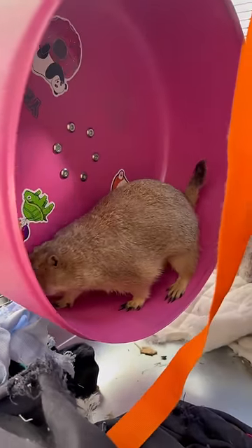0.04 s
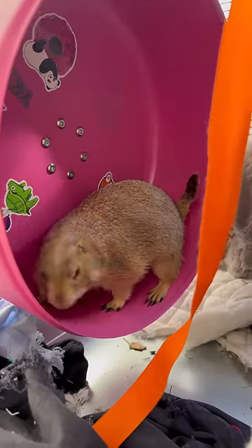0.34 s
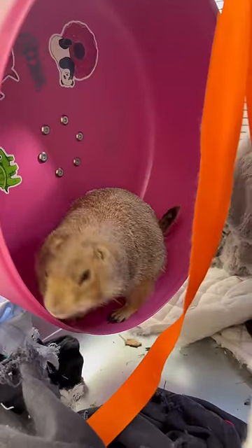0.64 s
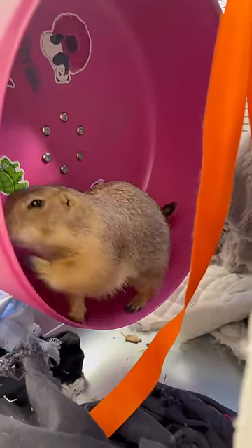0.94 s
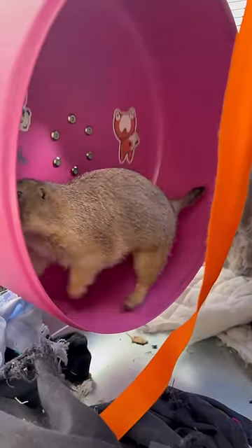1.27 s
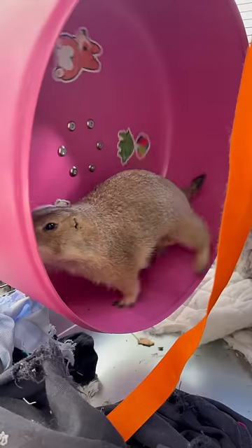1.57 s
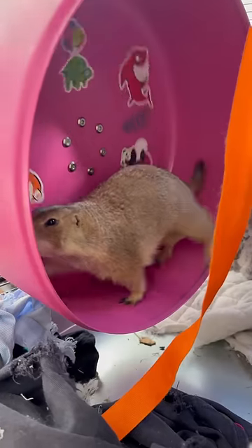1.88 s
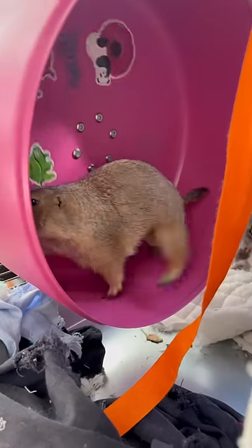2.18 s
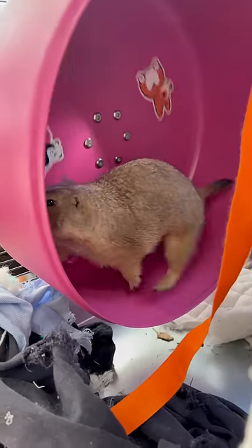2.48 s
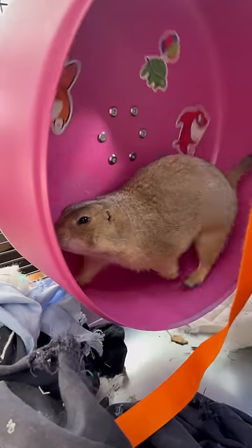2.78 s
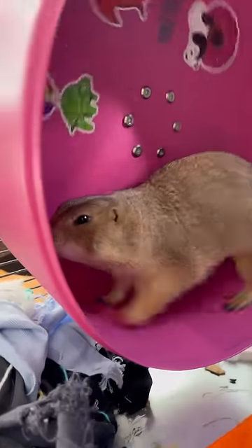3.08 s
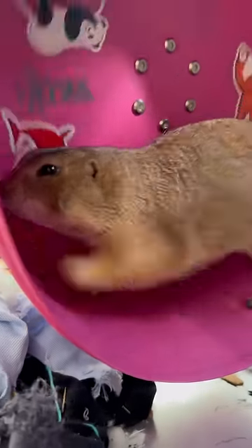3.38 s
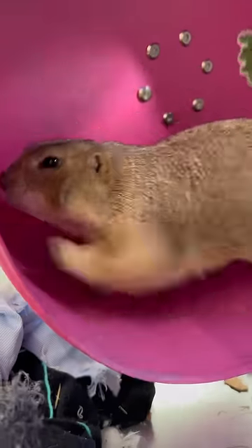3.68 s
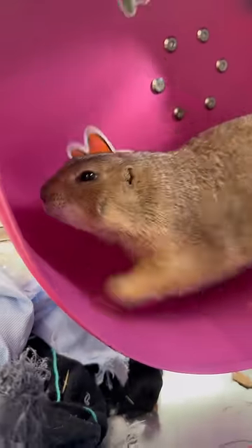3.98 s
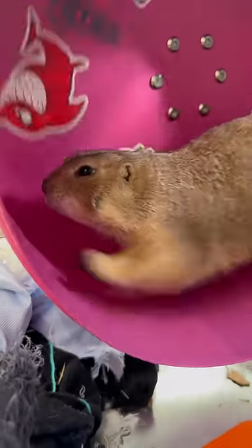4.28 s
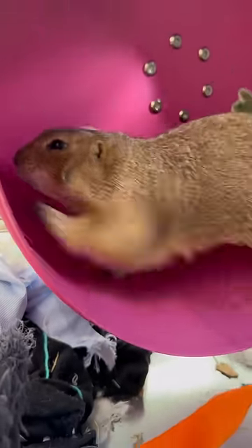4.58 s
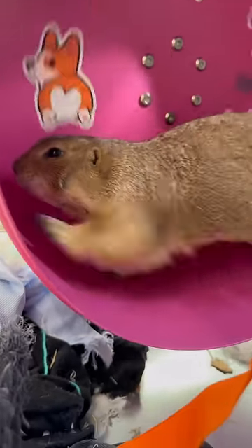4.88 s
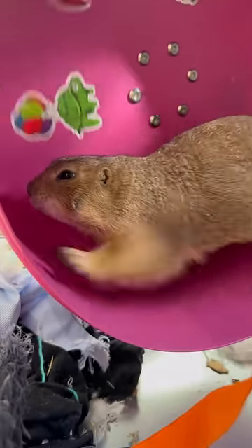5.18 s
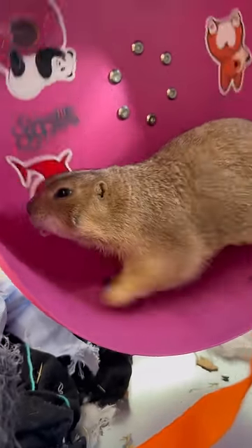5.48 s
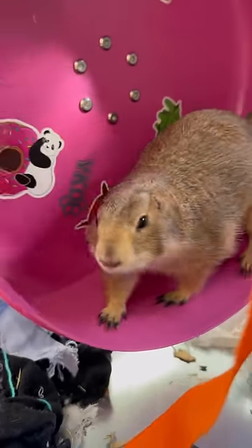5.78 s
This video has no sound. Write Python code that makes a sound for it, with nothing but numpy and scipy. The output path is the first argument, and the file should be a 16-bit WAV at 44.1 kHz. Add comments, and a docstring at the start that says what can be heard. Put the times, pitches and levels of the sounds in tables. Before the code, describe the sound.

Rapid metallic clicking and a low plastic rumble come from an exercise wheel as a prairie dog runs in it indoors.

```python
"""Prairie dog in an exercise wheel

Close to a stereo microphone in a small room, a prairie dog nudges a plastic wheel, runs in it and stops.
Each stride, about ten a second, throws the loose steel balls of the hub bearing in a shower of clicks.
At a run they drop back with a short rebound; the hardest contacts ring the hub, each at its own pitch.
Paws thump the drum, which rumbles, jolts on its axle and rocks on its stand; a wire frame rings on."""
import sys
import numpy as np
from scipy import signal
from scipy.fft import rfft, irfft, next_fast_len
from scipy.io import wavfile
from scipy.ndimage import map_coordinates

SR = 44100
rng = np.random.default_rng(int(sys.argv[2]) if len(sys.argv) > 2 else 0)


def waveform_to_disk(signal):
    """Save audio, clipped to [-1, 1], as 16-bit WAV at the path in sys.argv[1]."""
    frames = np.transpose(np.atleast_2d(signal))
    scaled = np.clip(frames, -1, 1) * 32767
    samples = np.round(scaled).astype(np.int16)
    wavfile.write(sys.argv[1], SR, samples)


N = 257544

# The small room. Each row: frequency in Hz, decay time (t60) in seconds.
ROOM_DECAY = [(200, 0.3), (2000, 0.74), (6000, 0.18), (15000, 0.13)]
# The microphone's two ports. Each row: frequency in Hz, then the value named alongside.
PORT_LIKENESS = [(60, 1), (300, .99), (640, .6), (1200, .95), (2200, .9), (3100, .6), (4500, .52),
                 (5500, .84), (8000, .76), (11000, .99), (13000, .99), (15500, .3)]  # likeness of left and right, 0 to 1
PORT_LEAD = [(60, 0), (5000, 0), (6200, -.6), (8000, -1.7), (10000, -2.9), (11000, -3.12), (13600, -3.2),
             (15400, -4.2)]  # lead of the left in radians
PORT_BALANCE = [(100, 0), (220, 0), (350, -3.3), (700, -3.8), (1100, -1.5), (1600, 0)]  # left over right in dB

# Noise colours. Each row: frequency in Hz, relative spectral density in dB.
HISS_SPECTRUM = [(300, 14.5), (700, 6), (1500, 1), (4000, -14), (10000, -22), (16000, -28)]  # faint background
RUMBLE_SPECTRUM = [(20, -48), (32, -12), (42, -11), (55, 1), (68, -3.5), (95, -7.5), (125, -26), (200, -22),
                   (500, -78)]  # low end of the turning wheel
SHELL_SPECTRUM = [(30, -19), (70, 1), (120, -2), (150, -3.5), (185, 0.5), (225, -8.5), (290, -3),
                  (315, -10), (345, 2), (390, 2), (430, -9.5), (530, -23.5), (680, -12), (850, -25.5),
                  (1500, -26), (4000, -22.5)]  # drone of the plastic drum
SCUFF_SPECTRUM = [(350, -22), (650, 1), (900, -3.5), (1200, -3.5), (1600, -7.5), (2500, -26)]  # feet brushing the plastic
ROLLING_SPECTRUM = [(900, -51), (1550, -32), (1850, 0.5), (2050, 0), (2450, -12), (2800, 4.5), (4500, 9),
                    (7000, -1), (9500, 2), (12000, -14), (15000, -8)]  # balls rolling in their race
TICK_SPECTRUM = [(1500, -55), (4000, -40), (7000, -4.5), (8500, 4), (10000, 7.5), (11500, 2), (13000, 6.5),
                 (14500, -2), (16000, 4)]  # bright front of a shower
CLATTER_SPECTRUM = [(600, -38), (1500, -31), (2300, -19.5), (2800, -8.5), (3600, -9.5), (4400, -1),
                    (5200, -4.5), (5900, 1), (7300, 0.5), (8500, -5.5), (11000, -41), (16000, -42)]  # duller body of a shower

# The parts that ring. Each row: frequency in Hz, relative level in dB, t60 in seconds.
DRUM_MODES = [(186.5, -7.5, 0.18), (289.6, -10.5, 0.18), (344, 9, 0.26), (370, 10, 0.11), (388.5, 3, 0.15),
              (469.2, -9, 0.44), (682, -11, 0.2)]  # plastic drum
MOUNT_MODES = [(446, 6.5, 0.061), (598, 5, 0.077), (674, 4.5, 0.17), (785, 6, 0.039), (917, -3, 0.22),
               (1196, -6, 0.28)]  # axle mount
FRAME_MODES = [(1836, -12, .9), (1960, -6, 0.45), (2261, -15, .5), (2604, -13, 0.8), (3698, -2, 0.5),
               (4140, 0, 0.5), (4339, -10, 0.32), (4544, -8, 0.25), (5491, -8, 0.25)]  # wire frame
PLATE_MODES = [(1771, -11, 0.9), (1831, -6, 0.2), (1965, 0, 0.09), (2013, 3.5, 0.12), (2075, 0, 0.08),
               (2210, 1, 0.11), (2330, 5, 0.11), (2612, 6, 0.07), (2672, 10, 0.06), (2740, 4, 0.1),
               (3030, 2, 0.12), (3130, 8, 0.08), (3300, 6, 0.11), (3560, 3, .1)]  # hub plate
RACE_MODES = [(3156, -4, 0.07), (4140, -7, 0.1), (4340, 1, .06), (4481, 2, 0.06), (4816, -2, 0.07),
              (4980, -2, 0.1), (5209, -3, 0.12), (5435, -2, 0.11), (5745, 2, 0.07), (5875, 3, 0.07),
              (5996, 1, 0.1), (6403, 1, .13), (6770, 0, .1), (7215, 3, 0.08), (7465, 1, 0.07),
              (8076, 0, 0.08), (8450, -2, 0.06), (9946, -8, 0.06), (15211, -10, .06)]  # bearing race

# The wheel rocking on its stand. Each row: time in seconds, mean pitch in Hz, mean level in dB.
STAND_ROCKING = [(0.0, 58.1, -56), (1.2, 56, -60), (1.85, 56.6, -57), (2.2, 52.5, -46.5),
                 (2.4, 52.4, -50.5), (2.75, 54, -55), (3.5, 54, -53), (3.7, 48.7, -51), (3.85, 47.3, -48.5),
                 (4.18, 48, -44.5), (4.3, 48.3, -48), (4.75, 47, -48), (5.0, 50.2, -56), (5.3, 49.96, -47),
                 (5.84, 54.5, -52)]
# The wheel turning. Each row: time in seconds, relative levels of drum and of rolling balls in dB.
WHEEL_LEVELS = [(0.0, -61, -105), (0.37, -63, -58), (0.63, -60.5, -49.5), (0.88, -61.5, -54.5),
                (1.54, -54, -35), (2.18, -52.5, -38.5), (2.5, -53, -40), (3.12, -48.5, -37.5),
                (4.02, -48, -38), (4.38, -47, -37), (5.46, -48, -39.5), (5.84, -52, -50)]
# Single blows. Each row: start in seconds, relative level in dB.
PAW_THUMPS = [(0.365, -37.5), (0.792, -46), (1.499, -52), (1.87, -37.5), (3.451, -33), (3.578, -31),
              (3.876, -32), (4.033, -39), (4.172, -36), (4.34, -34), (4.39, -33), (4.569, -35),
              (4.715, -30.5), (5.04, -33), (5.41, -33.5), (5.662, -35), (5.788, -35.5)]  # the heaviest footfalls
AXLE_JOLTS = [(1.741, -55), (3.575, -54), (3.927, -52), (4.029, -58), (4.22, -50), (4.359, -54),
              (4.454, -52), (4.512, -54), (4.801, -52)]  # the wheel shifting on its axle
FRAME_RINGS = [(0.0, -65), (5.68, -50)]  # the frame left ringing
# The hardest contacts in the hub. Each row: start in seconds, relative level in dB, centre pitch in Hz.
PLATE_KNOCKS = [(0.505, -46, 2105), (0.515, -54, 1670), (0.745, -50.5, 2360), (1.141, -48.5, 1953),
                (1.37, -48.5, 1990), (1.372, -40, 2900), (1.52, -46.5, 1915), (1.753, -42, 3000),
                (2.045, -41, 3250), (2.385, -49, 2070), (2.584, -46, 2730), (2.689, -39.5, 2860),
                (2.77, -41.5, 1950), (2.88, -40, 2820), (3.25, -44, 1990), (3.254, -47, 2770),
                (3.319, -48, 2700), (3.355, -47, 2020), (3.408, -43, 2840), (3.44, -45, 2100),
                (3.472, -45, 2775), (3.542, -41.5, 2000), (3.546, -41.5, 2600), (3.621, -45, 2110),
                (3.84, -45, 1910), (3.843, -41, 2610), (4.13, -37.5, 2638), (4.197, -41.5, 2700),
                (4.317, -44, 2750), (4.387, -40.5, 2740), (4.42, -38, 2660), (4.61, -42, 2800),
                (4.7, -48, 2130), (4.706, -42, 2720), (4.908, -49, 2700), (5.009, -45.5, 2700),
                (5.303, -46.5, 2510), (5.616, -35.5, 2840), (5.681, -52, 1875)]  # on the plate
HUB_PINGS = [(0.506, -34, 4310), (0.717, -30.5, 5970), (1.359, -24, 5980), (1.515, -29, 4350),
             (1.529, -27, 6400), (1.68, -34, 5990), (1.914, -31, 7570), (2.235, -31, 5860),
             (2.382, -30, 5860), (2.551, -23, 5750), (2.663, -23, 7640), (2.764, -25.5, 8460),
             (2.851, -24, 7560), (2.94, -27.5, 5970), (3.039, -32, 7290), (3.125, -29.0, 7040),
             (3.226, -28.5, 4880), (3.321, -31.0, 7270), (3.415, -31.0, 4450), (3.506, -25.5, 4340),
             (3.702, -30, 8090), (3.99, -26, 7900), (4.077, -27.5, 6850), (4.19, -25, 9270),
             (4.281, -31, 4500), (4.489, -24, 7250), (4.575, -30.5, 4330), (4.662, -32.5, 4690),
             (4.972, -26, 7270), (5.175, -24.5, 7270), (5.28, -29, 4730), (5.487, -32, 5740),
             (5.613, -29.5, 5970)]  # higher and shorter, set off by showers
# Shakes of the bearing, from a stride or the drop after it.
# Each row: peak time in seconds, relative level in dB, swell time in seconds, dullness in dB.
BEARING_SHOWERS = [(0.451, -31.5, 0.011, 3), (0.498, -13.5, 0.013, -5), (0.505, -16, 0.0014, 3.5),
                   (0.582, -21, 0.0068, -1), (0.678, -27.5, 0.0038, -8), (0.72, -23, 0.023, -1),
                   (0.904, -22, 0.0046, 3), (1.009, -22, 0.0014, 0.5), (1.053, -36, 0.028, -0.5),
                   (1.155, -25.5, 0.023, -0.5), (1.197, -19, 0.0014, -5.5), (1.249, -31, 0.023, 3),
                   (1.303, -20, 0.001, -0.5), (1.35, -19.5, 0.0012, -11), (1.357, -13, 0.0025, -6),
                   (1.37, -16, 0.006, 5.5), (1.404, -33, 0.016, 12), (1.454, -40.5, 0.027, 9),
                   (1.504, -15.5, 0.0085, 2), (1.535, -17, 0.0088, 8.5), (1.578, -26, 0.0095, 6),
                   (1.617, -20, 0.0084, 3.5), (1.646, -26, 0.00087, -2), (1.682, -11.5, 0.007, -4),
                   (1.751, -26, 0.016, -4.5), (1.818, -15.5, 0.0072, -5.5), (1.914, -14, 0.012, -3),
                   (1.954, -26, 0.001, -4), (1.977, -20, 0.0025, -8), (1.997, -26.0, 0.0027, 2),
                   (2.039, -22, 0.0079, 0.5), (2.094, -17.5, 0.0028, -2), (2.165, -24.0, 0.0018, 1),
                   (2.184, -21, 0.0042, 1), (2.237, -16, 0.0026, -3.5), (2.276, -27, 0.00094, 3),
                   (2.305, -25.5, 0.019, 0.5), (2.386, -15.5, 0.0069, 0), (2.44, -20, 0.003, 0),
                   (2.47, -21.5, 0.0061, 0.5), (2.506, -26.5, 0.0011, 3), (2.54, -16.5, 0.0022, -8),
                   (2.553, -12, 0.0058, -1), (2.591, -22, 0.0083, -0.5), (2.665, -18, 0.0025, 0.5),
                   (2.692, -26, 0.0027, 10), (2.764, -19, 0.01, 4), (2.795, -37, 0.0067, 16),
                   (2.838, -16, 0.0016, -15), (2.851, -11.5, 0.0056, -2.5), (2.882, -26, 0.002, 12),
                   (2.941, -15, 0.0037, -5.5), (2.981, -20.5, 0.0022, -4), (3.015, -30, 0.0014, 8),
                   (3.032, -13.5, 0.0014, -5), (3.041, -16, 0.004, -3), (3.077, -24.5, 0.001, -2.5),
                   (3.122, -14.5, 0.0037, -6), (3.132, -11.5, 0.0025, -5), (3.156, -19, 0.0012, -1),
                   (3.182, -30, 0.025, 2.5), (3.228, -13.5, 0.0031, -6.5), (3.253, -21, 0.001, -6),
                   (3.307, -35, 0.01, 7), (3.323, -16.5, 0.0035, -5.5), (3.356, -21, 0.0013, -3.5),
                   (3.406, -12.5, 0.0014, -7.5), (3.415, -12.5, 0.006, -5), (3.444, -20, 0.0033, -3),
                   (3.48, -32, 0.042, 4), (3.504, -11.5, 0.0031, -4), (3.549, -21, 0.0011, -11),
                   (3.615, -22.5, 0.012, -3), (3.629, -24, 0.001, 6.5), (3.698, -13, 0.0018, -3),
                   (3.708, -14.5, 0.0052, -5), (3.736, -21, 0.0027, 0), (3.774, -29, 0.021, -1),
                   (3.791, -16, 0.0023, 0.5), (3.842, -22, 0.00094, 1), (3.905, -16.5, 0.0055, -4),
                   (3.928, -23.5, 0.0011, -2), (3.994, -19.5, 0.0062, 0.5), (4.028, -17.5, 0.0015, -4),
                   (4.06, -28.5, 0.0041, 2), (4.081, -18, 0.0064, -4.5), (4.133, -20, 0.00091, -4),
                   (4.171, -32, 0.0015, -5), (4.195, -16, 0.0062, -2.5), (4.218, -22, 0.001, -5),
                   (4.279, -14, 0.006, -4.5), (4.319, -21, 0.00086, -4), (4.354, -27.5, 0.013, 1),
                   (4.374, -14.5, 0.0035, 1), (4.424, -18, 0.00093, -4), (4.482, -11, 0.003, -7),
                   (4.494, -13.5, 0.0048, 3), (4.511, -20.5, 0.0013, -4), (4.572, -14, 0.0065, -1),
                   (4.612, -19.5, 0.0011, -3.5), (4.643, -26.5, 0.0097, -3), (4.662, -15.5, 0.0026, 2.5),
                   (4.71, -21.5, 0.0014, -5.5), (4.782, -26, 0.0054, -4), (4.798, -25.5, 0.001, -3),
                   (4.868, -14.5, 0.0079, -3), (4.909, -20.5, 0.0035, -4), (4.975, -18, 0.0071, -1),
                   (5.013, -20.5, 0.0021, -2), (5.075, -16.5, 0.0017, -3.5), (5.107, -21.5, 0.0012, -2),
                   (5.166, -15, 0.0018, -9.5), (5.178, -11.5, 0.003, -3.5), (5.209, -23, 0.0015, 3),
                   (5.276, -18.5, 0.0021, -11), (5.285, -20.5, 0.0032, 2), (5.304, -23.5, 0.0015, 6),
                   (5.372, -20.5, 0.0024, -3), (5.392, -29, 0.00077, -8), (5.418, -26, 0.001, -8),
                   (5.486, -13.5, 0.004, -13.5), (5.497, -12, 0.0052, -0.5), (5.534, -22, 0.0063, -4.5),
                   (5.622, -17.5, 0.019, -3), (5.677, -22, 0.02, -2.5), (5.784, -32.5, 0.0022, -3)]

TOP_HZ, RACE_LOWEST_HZ = 15800, 1510  # band limit; the race's ringing is kept above the second
FADE_S, FADE_PER_SWELL = 0.0048, 0.38  # a shower's fade time: its floor, and the share of the swell added
DULL_SHARE = 0.55  # this share of the dullness adds to clatter and race; the rest comes off the ticks


def amp(db):
    """Decibels to gain."""
    return 10 ** (np.asarray(db) / 20)


def unit(x):
    """x at rms 1."""
    return x / np.sqrt(np.mean(x ** 2) + 1e-20)


def along(points, hz):
    """(Hz, value) points read on a log axis."""
    freqs, values = np.transpose(points)
    return np.interp(np.log(hz + 1), np.log(freqs + 1), values)


def curves(rows):
    """One value per sample for each column after the time."""
    times, *columns = np.transpose(rows)
    return [np.interp(np.arange(N) / SR, times, column) for column in columns]


def wobble(rate):
    """A smooth random curve, rate knots a second."""
    return map_coordinates(rng.standard_normal(int(N * rate / SR) + 4), [np.arange(N) * rate / SR])


def filtered(x, response):
    """x filtered by a function of frequency."""
    size = x.shape[-1]
    padded = next_fast_len(size + 8192)
    return irfft(rfft(x, padded) * response(np.fft.rfftfreq(padded, 1 / SR)), padded)[..., :size]


def coloured(x, spectrum):
    """Shape a white sound by a spectrum, keeping its power."""
    return filtered(x, lambda hz: unit(amp(along(spectrum, hz))))


def noise(spectrum):
    """Two unrelated coloured noises of rms 1."""
    return unit(coloured(rng.standard_normal((2, N)), spectrum))


def through(x, response):
    """x passed through a pair of impulse responses scaled to energy 1."""
    response = response / np.linalg.norm(response, axis=1, keepdims=True)
    return signal.fftconvolve(np.atleast_2d(x), response, axes=1)[:, :N]


def ring(modes, size, scatter_db=0, weights=1):
    """Decaying modes heard from two sides, at random phases and with scattered strengths."""
    hz, db, t60 = np.transpose(modes)[:, :, None]
    t = np.arange(size) / SR
    tones = amp(db - 60 * t / t60) * np.exp(2j * np.pi * hz * t)
    shape = (2, len(modes))
    strengths = weights * amp(scatter_db * rng.standard_normal(shape))
    phases = np.exp(2j * np.pi * rng.random(shape))
    return np.real((strengths * phases) @ tones)


def add(out, start, sound):
    """Mix a sound in from start seconds on."""
    part = out[:, max(0, round(start * SR)):][:, :sound.shape[1]]
    part += sound[:, :part.shape[1]]


def blows(hits, attack_s):
    """Place (start, dB, ringing) hits, each with a soft onset and levelled on its first 20 ms."""
    out = np.zeros((2, N))
    for start, db, ringing in hits:
        hit = ringing * (1 - np.exp(-np.arange(ringing.shape[1]) / SR / attack_s))
        add(out, start, amp(db) * hit / hit[:, :SR // 50].std())
    return out


def clicks(size, rate, spread_db):
    """Random contacts of uneven size, about rate a second, at rms 1."""
    impulses = (rng.random(size) < rate / SR) * rng.choice([-1, 1], size)
    return unit(impulses * amp(spread_db * np.clip(rng.standard_normal(size), -2, 2)))


def room(x):
    """The near walls return a short diffuse tail, longest around 2 kHz."""
    hz, t, spectra = signal.stft(rng.standard_normal((2, SR // 2)), SR, nperseg=256)
    decay = amp(-60 * t / along(ROOM_DECAY, hz)[:, None])
    build_up = 1 - np.exp(-t / 0.036)
    return through(x, signal.istft(spectra * decay * build_up, SR, nperseg=256)[1])


def microphone_ports(pair):
    """Two unrelated signals blend into left and right; the ports fall out of phase in the treble."""
    def blend(hz):
        angle = np.arccos(np.clip(along(PORT_LIKENESS, hz), 0, 1)) / 2
        return np.array([np.cos(angle), np.sin(angle)])

    def balance_and_phase(hz):
        side = np.array([[0.5], [-0.5]])
        return amp(side * along(PORT_BALANCE, hz)) * np.exp(1j * side * along(PORT_LEAD, hz))

    common, apart = filtered(pair, blend)
    return filtered(np.array([common + apart, common - apart]), balance_and_phase)


def stand():
    """The loaded wheel rocks on its stand with a deep, unsteady hum, lower and louder at a run."""
    hz, db = curves(STAND_ROCKING)
    level = amp(db + 2.2 * wobble(11))
    phase = 2 * np.pi * np.cumsum(hz + 3 * wobble(11)) / SR
    return level * np.sqrt(2) * np.sin(phase)


def turning_wheel():
    """The drum drones and rumbles under light, scuffing feet while the balls roll in their race."""
    drum_db, rolling_db = curves(WHEEL_LEVELS)
    rumble = amp(-53.5 + 0.49 * (drum_db - drum_db.mean())) * noise(RUMBLE_SPECTRUM)
    shell = amp(drum_db - 0.5 + 1.3 * wobble(25)) * noise(SHELL_SPECTRUM)
    footfalls = clicks(N, rate=70, spread_db=1.5)
    patter = amp(drum_db - 3.5) * through(footfalls, ring(DRUM_MODES, SR // 2))
    roll_level = amp(rolling_db + 5.6 * wobble(35))
    scuff = amp(drum_db - 16.5 + wobble(15)) * noise(SCUFF_SPECTRUM)
    axle_taps = clicks(N, rate=200, spread_db=2.5)
    axle = amp(drum_db - 15.5) * through(axle_taps, ring(MOUNT_MODES, SR // 4, scatter_db=0.5))
    return rumble + shell + patter + scuff + axle + rolling_balls(roll_level)


def rolling_balls(level):
    """Rolling steel makes a fine grit of contacts and keeps the race and hub plate ringing."""
    contacts = clicks(N, rate=650, spread_db=3)
    grit = ball_contacts(contacts, crack_t60=0.0045, tinkle_t60=0.016, tinkle_db=-13.5)
    out = amp(-9) * level * unit(coloured(grit, ROLLING_SPECTRUM))
    for modes, db in (RACE_MODES, -9), (PLATE_MODES, -13.5):
        force = level * clicks(N, rate=600, spread_db=1.5)
        out += amp(db) * through(force, ring(modes, SR // 2, scatter_db=4))
    return out


def wire_frame():
    """The wire frame rings thinly: faintly at the outset, and again as the wheel stops."""
    hits = [(start, db, ring(FRAME_MODES, SR, scatter_db=4)) for start, db in FRAME_RINGS]
    return blows(hits, attack_s=0.00078)


def axle_jolts():
    """Play in the axle gives short dry taps."""
    hits = [(start, db, ring(MOUNT_MODES, SR // 4, scatter_db=2.5)) for start, db in AXLE_JOLTS]
    return blows(hits, attack_s=0.00045)


def paws():
    """Soft pads thump the plastic drum."""
    hits = [(start, db, ring(DRUM_MODES, SR // 2, scatter_db=1)) for start, db in PAW_THUMPS]
    return amp(-11) * blows(hits, attack_s=0.006)


def hub_plate(reach=0.096):
    """Where a knock lands decides which plate modes answer; reach is their span in log frequency."""
    mode_hz = np.transpose(PLATE_MODES)[0]
    hits = []
    for start, db, hz in PLATE_KNOCKS:
        nearness = np.exp(-(np.log(mode_hz / hz) / reach) ** 2)
        hits.append((start, db, ring(PLATE_MODES, SR, scatter_db=5.5, weights=nearness)))
    return amp(2) * blows(hits, attack_s=0.005)


def hub_pings(spread=0.022, t60=0.042):
    """A hard shower rings three close modes of the hub, which beat and die quickly."""
    hits = []
    for start, db, hz in HUB_PINGS:
        cluster = [(hz * (1 + detune), 0, t60) for detune in (-spread, 0, spread)]
        hits.append((start, db, ring(cluster, SR // 5)))
    return amp(-1.5) * blows(hits, attack_s=0.009)


def hub_hollow(force, t60=0.012):
    """Each shower lands somewhere else on the hub and finds other broad resonances."""
    modes = [(hz, 0, t60) for hz in rng.uniform(2600, 9000, 4)]
    return amp(-3) * through(force, ring(modes, SR // 16))


def ball_contacts(force, crack_t60, tinkle_t60, tinkle_db):
    """Steel balls strike with a short crack and a fresh handful of ringing tones."""
    t = np.arange(SR // 16) / SR
    crack = rng.standard_normal((2, len(t))) * amp(-60 * t / crack_t60)
    modes = [(hz, 0, tinkle_t60) for hz in rng.uniform(2500, TOP_HZ, 26)]
    tinkle = ring(modes, len(t), scatter_db=1)
    return through(force, crack) + amp(tinkle_db) * through(force, tinkle)


def showers(resonator, dull_share, max_lag_s=0, brief_s=0.0015):
    """Thrown balls drive a resonator in bursts that swell and fade; brief ones open with a hard hit."""
    out = np.zeros((2, N))
    t = np.arange(-SR // 12, SR // 10) / SR
    for peak, db, swell, dull_db in BEARING_SHOWERS:
        early = np.minimum(-t / max(swell, 0.0005), 20)  # swell times before the peak
        onset = early + 0.1 * np.maximum(early, 0) ** 2  # the square steepens the rise
        envelope = 2 / (np.exp(onset) + np.exp(t / (FADE_S + FADE_PER_SWELL * swell)))
        contacts = unit(envelope * clicks(len(t), rate=5500, spread_db=4))
        contacts *= np.sqrt(np.mean(envelope ** 2))
        first_hit = 0.6 * np.linalg.norm(envelope) * np.exp(-(swell / brief_s) ** 2)
        contacts[np.searchsorted(t, -swell)] += first_hit
        start = peak + t[0] + max_lag_s * np.tanh(swell / FADE_S)
        add(out, start, resonator(amp(db + dull_share * dull_db) * contacts))
    return out


def bearing(max_lag_s=0.0039):
    """Hard bright ticks come first, a duller clatter follows, and the race rings on."""
    def bright(force):
        return ball_contacts(force, crack_t60=0.008, tinkle_t60=0.013, tinkle_db=-11.5)

    def dull(force):
        return ball_contacts(force, crack_t60=0.012, tinkle_t60=0.06, tinkle_db=-2) + hub_hollow(force)

    def ringing(force):
        return through(force, ring(RACE_MODES, SR // 3, scatter_db=6.5))

    ticks = coloured(showers(bright, DULL_SHARE - 1), TICK_SPECTRUM)
    clatter = coloured(showers(dull, DULL_SHARE, max_lag_s), CLATTER_SPECTRUM)
    race = showers(ringing, DULL_SHARE, max_lag_s)
    race = filtered(race, lambda hz: hz ** 4 / (hz ** 4 + RACE_LOWEST_HZ ** 4))
    return amp(-3) * ticks + amp(-12.5) * clatter + amp(-12) * race


def scene():
    """The wheel close up over a faint hiss, a little room on the metal, the stand's hum dead centre."""
    metal = bearing() + hub_pings() + hub_plate() + wire_frame()
    hiss = amp(-68) * noise(HISS_SPECTRUM)
    at_microphone = metal + amp(-14) * room(metal) + paws() + axle_jolts() + turning_wheel() + hiss
    return microphone_ports(at_microphone) + stand()


def record(dry):
    """The microphone drops the bass below 33 Hz, and the top falls away steeply at the band limit."""
    return filtered(dry, lambda hz: hz ** 6 / (hz ** 6 + 33 ** 6) / (1 + (hz / TOP_HZ) ** 200))


dry = scene()
out = record(dry)
waveform_to_disk(out)
```